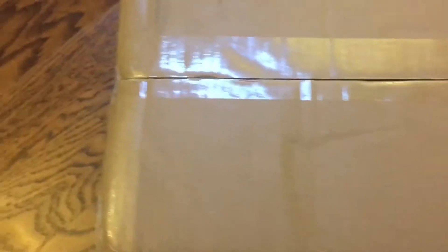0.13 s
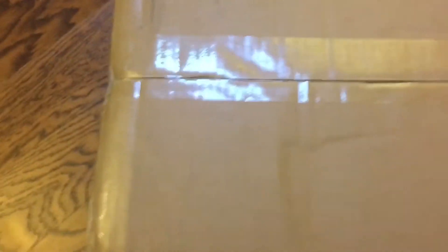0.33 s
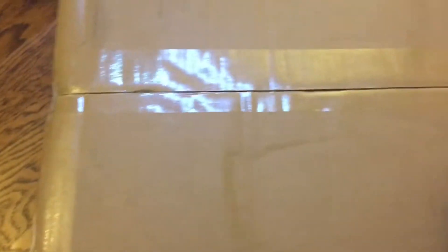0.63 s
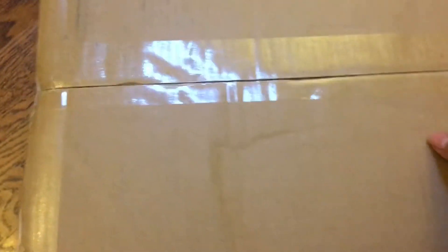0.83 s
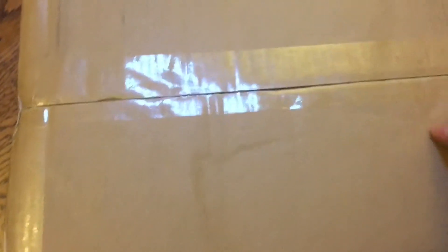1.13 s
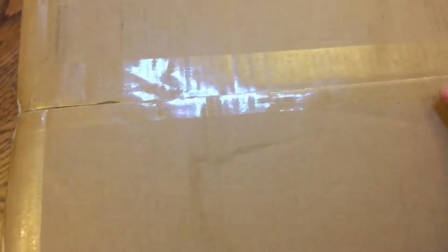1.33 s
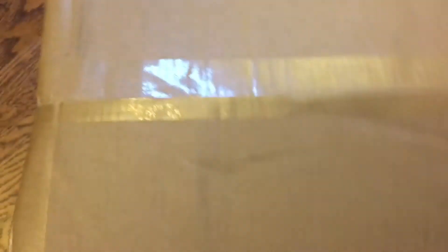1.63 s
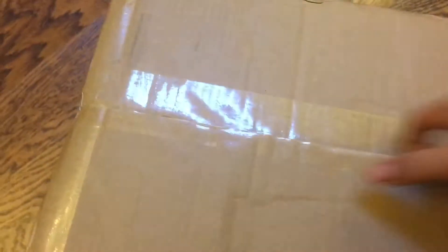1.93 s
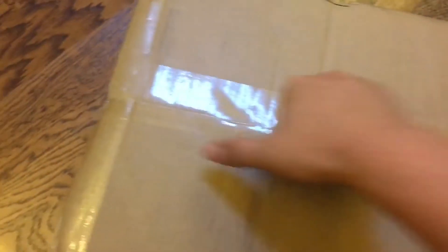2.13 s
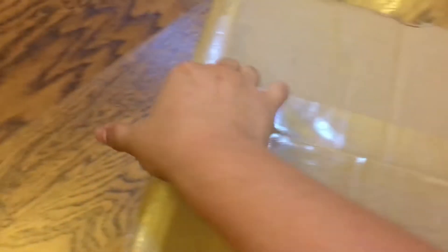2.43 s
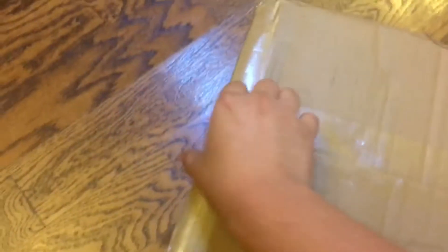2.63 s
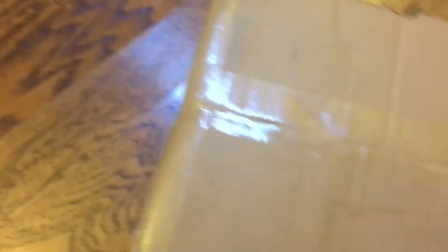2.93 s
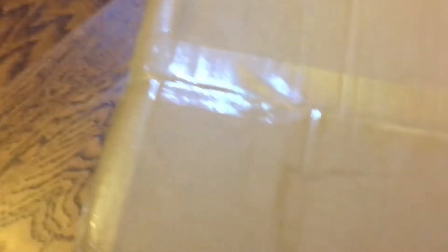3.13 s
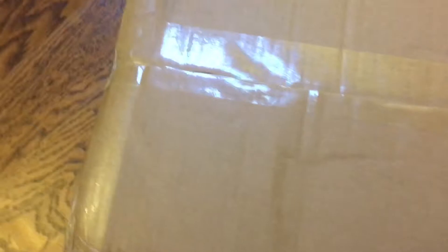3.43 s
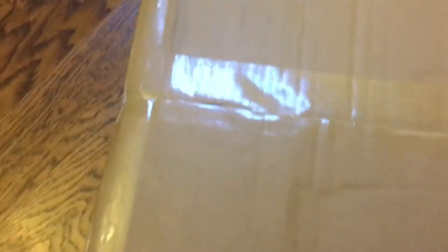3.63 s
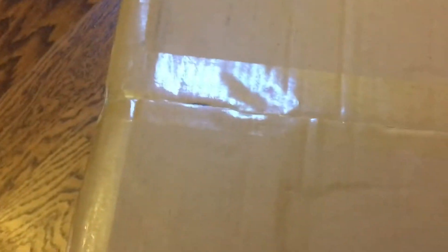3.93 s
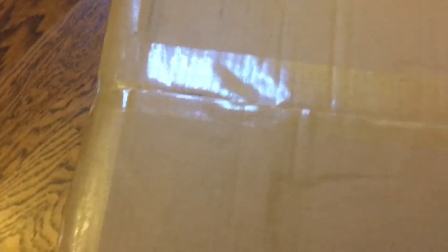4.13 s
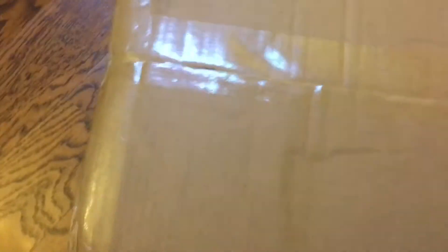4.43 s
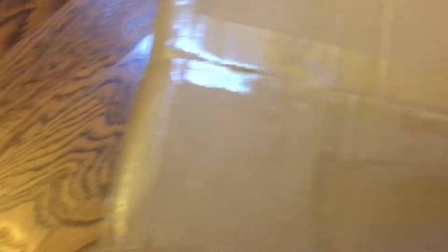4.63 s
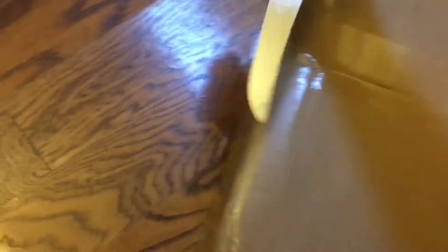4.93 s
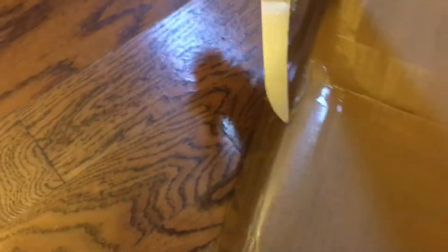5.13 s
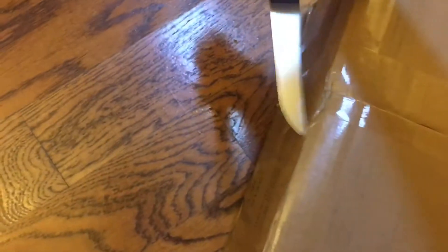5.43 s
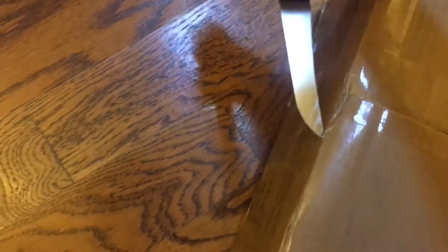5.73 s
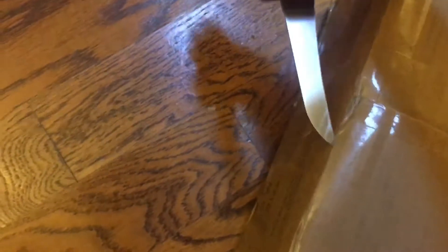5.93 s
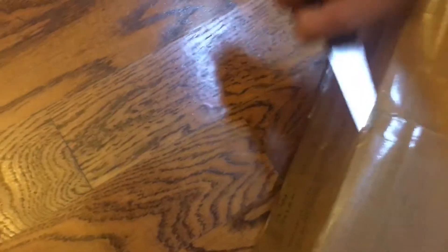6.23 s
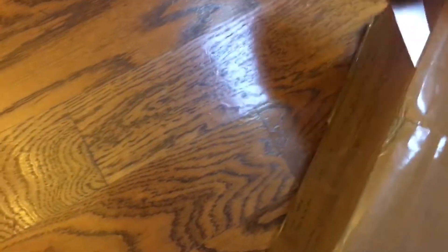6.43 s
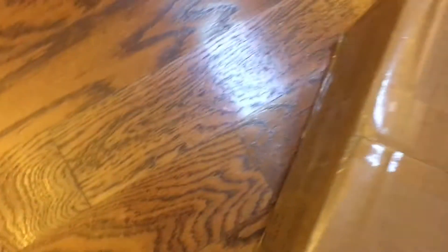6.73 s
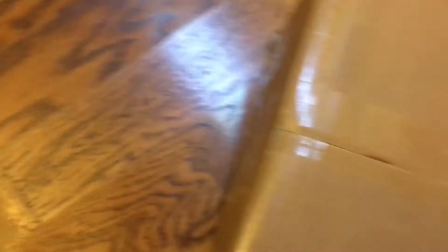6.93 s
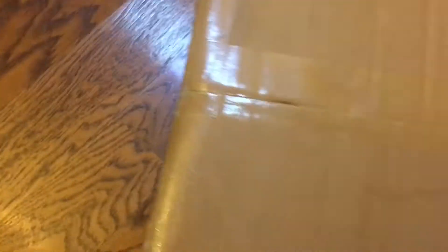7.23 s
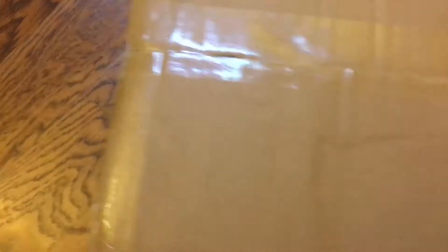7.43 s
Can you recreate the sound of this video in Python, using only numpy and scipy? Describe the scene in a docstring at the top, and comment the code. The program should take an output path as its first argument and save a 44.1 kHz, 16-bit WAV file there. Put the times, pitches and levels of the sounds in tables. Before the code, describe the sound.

Hard, boxy clattering with brief steel ringing opens the scene, fading into rasping card. Loud tape snaps, papery friction and dull flap thumps follow, then near quiet with small knocks and a light metallic tick. Dry, crisp pops multiply as a blade works into the tape, with a scrape, before a last clattering knock. Close handheld pickup, indoors, short room echo, faint low hum.

```python
"""A knife clatters and bounces on a cardboard box, hands slide over flaps and tape, the tape snaps and
crackles as the blade pokes and slits it, over faint air noise and a low hum. Noise bursts ring the box
panels (knocks) and tuned peaks (snaps); sines ring the blade; clustered random catches make the rubbing;
decaying noise makes the room's echo."""
import sys
import numpy as np
from scipy import signal
from scipy.fft import rfft, irfft
from scipy.io import wavfile

SR = 44100
rng = np.random.default_rng(int(sys.argv[2]) if len(sys.argv) > 2 else 0)


def dump_mix(stems):
    """Bounce the given channels to the path in sys.argv[1] as a 16-bit WAV at rate SR."""
    frames = np.atleast_2d(stems).T  # one column per channel
    limited = np.clip(frames, -1, 1)  # hard clip at full scale
    pcm = np.round(limited * 32767).astype(np.int16)
    wavfile.write(sys.argv[1], SR, pcm)


N = 334719

FIRM_RUB_DB = -50.5   # level at which a rub counts as firm
SNAP_S = 0.0023   # decay time of the spray in crackle and in a snap's echo


def from_db(db):
    """Decibels to gain."""
    return 10 ** (np.asarray(db) / 20)


def rms_one(x):
    """Scale to unit rms."""
    return x / np.sqrt(np.mean(x ** 2) + 1e-20)


def at_hz(points, hz):
    """Read a (f/Hz, value) table on a log-frequency axis."""
    table_hz, values = np.array(points)[:, :2].T
    return np.interp(np.log(hz), np.log(table_hz), values)


def coloured(x, spectrum):
    """Filter a white signal to a spectrum; unit rms."""
    hz = np.maximum(np.arange(N // 2 + 1) * SR / N, 1)
    return rms_one(irfft(rfft(x) * from_db(at_hz(spectrum, hz)), N))


def drift(rate_hz):
    """Slow random wander with spread 1: noise through a two-pole low-pass."""
    r = np.exp(-2 * np.pi * rate_hz / SR)
    wander = signal.lfilter([1], [1, -2 * r, r * r], rng.standard_normal(N + SR))
    return rms_one(wander[SR:])   # skip the filter's start-up


def resonance(x, hz, width_hz):
    """Two-pole peak with gain 1 on top."""
    r = np.exp(-np.pi * width_hz / SR)
    zeros = [(1 - r * r) / 2, 0, (r * r - 1) / 2]
    poles = [1, -2 * r * np.cos(2 * np.pi * hz / SR), r * r]
    return signal.lfilter(zeros, poles, x)


def burst(noise, decay_s):
    """One sharp break followed by a dying spray of smaller ones."""
    spray = noise * np.exp(-np.arange(len(noise)) / (max(decay_s, 1e-4) * SR))
    spray[0] = 2.8
    return spray


def add(track, s, sound, peak_db):
    """Lay a sound on the track at s seconds with its peak at the given level."""
    i = round(s * SR)
    scaled = from_db(peak_db) * sound / np.abs(sound).max()
    track[i:i + len(sound)] += scaled[:N - i]


def house():
    """Broad air noise, and a wavering low hum from noise through two equal narrow peaks."""
    # quiet air: f/Hz, relative level per Hz/dB
    air_spectrum = [(15, -38), (25, -14), (59, -5.5), (127, -7.5), (200, -27.5), (229, -14.5), (476, -28),
                    (1700, -33), (2910, -36), (3620, -38), (5000, -40.5), (7310, -42.5), (16000, -48.5)]
    air_db, hum_db = -62.5, -62
    hum_hz, hum_width_hz = 61, 6.2   # width of each peak
    air = coloured(rng.standard_normal(N), air_spectrum)
    hum = resonance(rng.standard_normal(N), hum_hz, hum_width_hz)
    hum = resonance(hum, hum_hz, hum_width_hz)
    return from_db(air_db) * air + from_db(hum_db) * rms_one(hum)


def room(x):
    """Dense reflections: noise that dies faster or slower by half-octave band."""
    # reverberation time: f/Hz, t60/s
    decay_times = [(200, .35), (530, .5), (1400, 0.52), (3700, 0.45), (9700, 0.19)]
    # colour of the echo: f/Hz, level/dB
    echo_colour = [(100, -12), (400, -6.5), (1200, -0.5), (3000, -4), (6000, -8), (14000, -6.5)]
    t = np.arange(SR) / SR
    edges = 70 * 2 ** np.arange(0, 8.1, .5)
    white = rng.standard_normal((2, SR))   # neighbouring bands take different noise
    tail = 0
    for k, (low, high) in enumerate(zip(edges, edges[1:])):
        hz = np.sqrt(low * high)
        band_pass = signal.butter(2, [low, high], "band", fs=SR, output="sos")
        band = signal.sosfilt(band_pass, white[k % 2])
        level_db = at_hz(echo_colour, hz) - 60 * t / at_hz(decay_times, hz)
        tail = tail + band * from_db(level_db)
    tail = tail * np.clip(t / 0.0081, 0, 1)   # first walls answer after a few ms
    return signal.fftconvolve(x, tail / np.sqrt(np.sum(tail ** 2)))[:N]


def thumps():
    """A slow push sets one large panel swinging for a few cycles."""
    # soft palms and flaps pushing the big panels: t/s, peak level/dB, f/Hz
    pushes = [(0.678, -37.5, 333), (1.264, -44, 182), (1.391, -39, 370), (1.505, -27, 238),
              (1.541, -31, 235), (1.716, -26, 233), (1.736, -45, 71.6), (1.831, -34.5, 111),
              (1.965, -37, 114), (2.08, -42, 99), (2.171, -35.5, 93), (2.201, -34.5, 103), (2.249, -46, 79),
              (2.476, -43, 182), (2.76, -45.5, 174), (3.81, -45.5, 288), (3.84, -35, 304),
              (3.898, -42, 250), (5.803, -44.5, 241), (6.199, -39, 288), (6.315, -37.5, 205),
              (6.663, -41.5, 310)]
    thump_cycles = 1.72   # the swell peaks at half this many cycles
    out, t = np.zeros(N), np.arange(SR // 5) / SR
    for s, db, hz in pushes:
        cycles = hz * t
        swell = cycles * np.exp(-cycles * 2 / thump_cycles)
        add(out, s, swell * np.sin(2 * np.pi * cycles), db)
    return out


def friction(spectrum, per_s, spread_db, smooth, lumps_db, patch_db):
    """Fibres catch at random, in clumps, over a smooth hiss; each catch has its own pitch range."""
    sizes = from_db(spread_db * np.minimum(rng.exponential(1, N), 5)) * rng.choice([-1, 1], N)
    clumped_rate = per_s * from_db(5 * drift(25))
    caught = rms_one(sizes * (rng.random(N) < clumped_rate / SR))
    pitches = np.geomspace(spectrum[1][0], min(spectrum[-2][0], 14000), num=6)
    dealt = rng.integers(0, len(pitches), size=N)   # pitch range of each catch
    grains = 0
    for k, hz in enumerate(pitches):
        patches = from_db(patch_db * drift(3.5))   # each range swells and fades by itself
        force = caught * (dealt == k) + smooth * rng.standard_normal(N)
        # sqrt(hz): wider bands get more power
        grains = grains + patches * rms_one(resonance(force, hz, 0.44 * hz)) * np.sqrt(hz)
    return coloured(grains * from_db(lumps_db * drift(28)), spectrum)


def crackle(rub):
    """Small snaps come at random, more often the firmer the tape is rubbed, each a short pitched spray."""
    firm_rate_per_s = 67   # at a firm rub
    level_db, spread_db = -10, 1.5   # level against the rub; spread of snap sizes
    sizes = from_db(spread_db * np.minimum(rng.exponential(1, N), 3))
    chance = firm_rate_per_s / SR * np.sqrt(rub / from_db(FIRM_RUB_DB))
    starts = sizes * (rng.random(N) < chance)
    pitches = np.geomspace(1300., 7500., num=5)
    dealt = rng.integers(0, 5, size=N)   # pitch of each snap
    fade = np.exp(-1 / (SNAP_S * SR))
    ticks = 0
    for k, hz in enumerate(pitches):
        envelope = signal.lfilter([1], [1, -fade], starts * (dealt == k) + 1e-18)
        ticks = ticks + resonance(envelope * rng.standard_normal(N), hz, 0.27 * hz)
    return from_db(level_db) * rub * rms_one(ticks)


def rubbing():
    """Hands and blade slide: card rasps, tape hisses and crackles, the panels rumble along."""
    # sliding contact, one list a passage: t/s, card rasp level/dB, tape hiss level/dB, its treble level/dB
    passages = [
        [(0.45, -33.5, -45, -67), (0.528, -48, -45, -73), (0.588, -47, -57, -73), (0.702, -41, -63, -63),
         (0.796, -59, -66, -74), (0.894, -55, -73.5, -82), (0.98, -59.5, -77.5, -83.5)],
        [(1.0, -69, -90.5, -82.5), (1.15, -59, -52, -79.5), (1.198, -83, -52.5, -45), (1.286, -51, -51.5, -66),
         (1.338, -60.5, -54, -66), (1.416, -51.5, -55, -60), (1.566, -53.5, -49, -57.5),
         (1.76, -46.5, -58.5, -63), (1.93, -57, -58, -65.5)],
        [(1.94, -56, -51.5, -61.5), (2.004, -50.5, -50.5, -56), (2.122, -52, -48, -50),
         (2.176, -43, -48.5, -49.5), (2.336, -54.5, -53, -53.5), (2.476, -53, -50, -61.5),
         (2.57, -61.5, -66, -77.5), (2.896, -71, -73.5, -73), (2.95, -79, -72.5, -80.5)],
        [(3.0, -77, -83, -75.5), (3.298, -71.5, -79.5, -79), (3.57, -79, -85.5, -84), (3.868, -69, -81.5, -82),
         (4.002, -62.5, -79.5, -88), (4.06, -57, -74.5, -74.5), (4.132, -65, -62, -61), (4.3, -73, -74, -81),
         (4.6, -80.5, -82, -79.5)],
        [(5.0, -75, -79, -77.5), (5.188, -66.5, -85, -88), (5.306, -69.5, -74, -73.5), (5.454, -65.5, -68, -72),
         (5.612, -69, -64, -70), (5.77, -68, -71.5, -80.5), (5.894, -70, -77, -78), (6.034, -64.5, -65, -67),
         (6.09, -82.5, -82.5, -86)],
        [(6.11, -38, -46.5, -68.5), (6.158, -50, -48.5, -47.5), (6.28, -45.5, -52.5, -56.5),
         (6.35, -46, -49, -55.5), (6.528, -45.5, -57, -50.5), (6.586, -53.5, -58, -53), (6.71, -46, -45, -45)],
        [(6.73, -58, -62.5, -66.5), (6.772, -70.5, -65.5, -65), (6.948, -63.5, -71, -71),
         (7.074, -69.5, -69.5, -74), (7.286, -74, -80.5, -79.5), (7.45, -70, -74.5, -76)],
    ]
    # panel rumble at a firm rub, one a passage; palms push the box more than the blade: level/dB
    passage_rumble_db = [-62.5, -48.5, -50.5, -52.5, -48.5, -57, -51]
    # card: f/Hz, relative level per Hz/dB
    rasp_spectrum = [(240, -26), (400, 5.5), (532, 4), (1580, 5.5), (2260, 0), (3040, -10.5), (3490, -0.5),
                     (5000, -17.5), (6500, -56), (11000, -120)]
    # tape: f/Hz, relative level per Hz/dB
    hiss_spectrum = [(1180, -55), (2000, -3.5), (2830, -8.5), (4570, -3.5), (6700, -8.5), (9740, -12.5),
                     (10500, -13.5), (14000, -11), (16000, -11)]
    # panels: f/Hz, relative level per Hz/dB
    rumble_spectrum = [(24, -36), (40, -2), (102, 3), (151, 1), (423, -6), (534, -37.5), (900, -9.5),
                       (1170, -49), (1980, -120)]
    rumble_follows = 0.98   # share of the rub's dB swing that the rumble follows
    tape_lumps_db, card_lumps_db, panel_lumps_db = 1.6, 3.5, 3   # fast unevenness
    t = np.arange(N) / SR
    s, *levels = np.transpose(np.vstack(passages))
    rasp, hiss, sheen = [from_db(np.interp(t, s, level, -120, -120)) for level in levels]
    rub = np.hypot(rasp, hiss)
    push_db = np.interp(t, s, np.repeat(passage_rumble_db, [len(passage) for passage in passages]))
    rumble = from_db(push_db) * (rub / from_db(FIRM_RUB_DB)) ** rumble_follows
    # the tape's body and treble are split so that each follows its own level
    tape = friction(hiss_spectrum, 2100.0, 1.7, 0.42, tape_lumps_db, 2.4)
    top = signal.sosfilt(signal.butter(4, 7500., "high", fs=SR, output="sos"), tape)
    body = signal.sosfilt(signal.butter(4, 7500., fs=SR, output="sos"), tape)
    card = friction(rasp_spectrum, 450., 4.2, 0.49, card_lumps_db, 2.6)
    panels = friction(rumble_spectrum, 49.0, 3.1, 1.0, panel_lumps_db, 1.5)
    return rasp * card + hiss * rms_one(body) + sheen * rms_one(top) + rumble * panels + crackle(hiss)


def box(force, pitch_hz=600., deep_db=0., bright_db=0.):
    """The panels ring in parallel, signs alternating; a blow's spot and hardness favour some panels."""
    # box panels: f/Hz, width/Hz, relative level/dB
    panels = [(131, 13, -23.5), (250, 72, -14.5), (325, 91, -1.5), (433.8, 85, -3.5), (547, 68, -3),
              (656.7, 110, -3.5), (722.2, 120, -5), (925, 117, -4.5), (1147, 170, -5.5), (1436, 120, -6),
              (1740, 260, -4.5), (1940, 88, 2.5), (2350, 220, -0.5), (2849, 90, -3), (3330, 730, -9),
              (4400, 2800, -17), (7650, 3600, -27.5)]
    tilt = [(pitch_hz / 4, 2.0 * deep_db), (pitch_hz / 2, deep_db), (pitch_hz, 0.), (4 * pitch_hz, bright_db)]
    ringing = 0
    for k, (hz, width_hz, db) in enumerate(panels):
        gain = (-1) ** k * from_db(db + at_hz(tilt, hz))
        ringing = ringing + gain * resonance(force, hz, width_hz)
    return ringing


def snaps():
    """Each snap has a pitched body, a treble edge and a share that shakes the box; returns near and far."""
    # tape and card snapping: t/s, body peak level/dB, f/Hz, treble and box levels against the body/dB,
    # decay time/s
    snap_table = [(1.052, -60, 1540, -14.5, -19, 0.0017), (1.1425, -27.5, 1240, -36, -36, 0.0014),
                  (1.163, -10, 1870, -48, -22.5, 0.0022), (1.206, -45, 1800, -36, -33, 0.0015),
                  (1.2746, -30.5, 1200, -20, -1.5, 0.0023), (1.2835, -16, 3970, -25, -14.5, 0.0027),
                  (1.363, -28.5, 3860, -10, -28, 0.0014), (1.381, -24.5, 2340, -15, -31, 0.0016),
                  (1.391, -23, 3400, -12, -31, 0.0023), (1.4, -18.5, 3480, -15, -9, 0.0013),
                  (1.4293, -20.5, 3150, -13, -9.5, 0.0027), (1.503, -15.5, 1270, -40, -39, 0.0042),
                  (1.5325, -19, 4400, -17, -10, 0.0042), (1.5673, -20.5, 1410, -25, -15, 0.0032),
                  (1.5974, -20, 2200, -35, -26, 0.0014), (1.661, -44, 1150, -29, -16, 0.0016),
                  (1.723, -26, 5230, -17, -9, 0.0048), (1.7866, -30.5, 1300, -15, -20, 0.0019),
                  (2.0446, -21.5, 1950, -18, -24, 0.00053), (2.15, -32, 5300, -15, -7, 0.0019),
                  (2.4535, -24.5, 1660, -26, -24, 0.0016), (2.471, -26, 1730, -25, -29, 0.00088),
                  (2.4957, -23, 4180, -7, -13.5, 0.0008), (2.6573, -21.5, 5000, 1, -18, 0.00053),
                  (2.6943, -33, 3950, -4, -18, 0.0023), (2.7564, -33, 1340, -15, -13, 0.001),
                  (2.773, -30.5, 3200, -20, -8.5, 0.0012), (2.784, -37.5, 2050, -29, -4, 0.0026),
                  (3.181, -40, 6300, -15, -22.5, 0.0019), (3.3536, -51.5, 5040, -7.5, -26, 0.0016),
                  (3.8048, -44.5, 1450, -12.5, -14, 0.0016), (3.8454, -28, 2020, -13, -24, 0.0008),
                  (3.8737, -35, 1510, -26, -18, 0.00088), (4.2646, -42.5, 2360, -31, -28, 0.0029),
                  (4.4817, -29, 3260, -8, -28.5, 0.0014), (4.761, -47, 6500, -11, -18, 0.0016),
                  (5.252, -34.5, 3254, -16, -7, 0.0016), (5.2893, -24, 3210, -25, -34, 0.0011),
                  (5.3606, -20.5, 3330, -6, -18, 0.0016), (5.3714, -11.5, 2315, -12.5, -27, 0.0011),
                  (5.499, -39.5, 2100, -20, 0, 0.0016), (5.5347, -22, 2500, -53, -26, 0.0018),
                  (5.5618, -31, 3840, -25, -20, 0.0025), (5.5852, -26.5, 3700, -21, -10.5, 0.0012),
                  (5.5966, -33, 1880, -22, -26, 0.0024), (5.63, -25, 3300, -19, -15.5, 0.002),
                  (5.8043, -17.5, 2350, -5, -19, 0.0023), (5.9327, -28, 2410, -25.5, -18, 0.0017),
                  (5.9416, -21.5, 6650, -26, -29, 0.0012), (5.9793, -25.5, 2420, -43, -20, 0.0022),
                  (6.019, -47, 2410, -19, -20.5, 0.0011), (6.1049, -11, 4170, -8, -20.5, 0.00077),
                  (6.128, -17.5, 4300, -8, -30, 0.0033), (6.1805, -25.5, 1780, -33, -30, 0.0028),
                  (6.202, -30, 1140, -25, -3, 0.0022), (6.348, -26.5, 1880, -23, -16, 0.0016),
                  (6.4158, -8, 3810, -7, -26, 0.0023), (6.4493, -16.5, 1810, -3, -38, 0.00053),
                  (6.491, -15, 1850, -5, -25, 0.00053), (6.707, -23.5, 5560, -30, -25, 0.0022),
                  (6.7785, -36, 5150, -8.5, -21, 0.0021), (6.9513, -34, 4400, -9, -19, 0.0013),
                  (7.3412, -40, 2446, -20, -27, 0.0018)]
    room_db, room_width = -15, 1.1   # echo send against the body; width of its peaks over the pitch
    near, far = np.zeros(N), np.zeros(N)
    edge = signal.butter(2, 6500., "high", fs=SR)
    noises = rng.standard_normal((len(snap_table), 1500))
    for (s, db, hz, treble_db, box_db, decay_s), noise in zip(snap_table, noises):
        force = burst(noise, decay_s)
        add(near, s, resonance(force, hz, 0.55 * hz), db)
        add(near, s, signal.lfilter(*edge, force), db + treble_db)
        dull_force = signal.lfilter([.1], [1, -.9], force)
        add(near, s, box(dull_force), db + box_db)
        echo = resonance(burst(.1 * noise, SNAP_S), hz, room_width * hz)
        add(far, s, resonance(echo, hz, room_width * hz), db + room_db)
    return near, far


def clinks():
    """A bright crack of filtered noise, then the steel modes ring on as dying sines; returns both."""
    # steel blade struck: t/s, crack peak level/dB, crack f/Hz, crack decay time/s, ring peak level/dB
    strikes = [(0.2713, -13.5, 3220, 0.0031, -61), (0.3205, -9.5, 5800, 0.0041, -56),
               (0.4238, -4.5, 4000, 0.0026, -28.5), (0.578, -37, 5960, 0.0015, -59),
               (0.68, -31, 9000, 0.0012, -56), (4.0771, -21.5, 5640, 0.0069, -44),
               (4.1024, -20, 5040, 0.006, -64), (7.4405, -24.5, 5896, 0.0033, -53),
               (7.519, -14, 4130, 0.002, -34.5)]
    # blade modes: f/Hz, relative level/dB, t60/s
    modes = [(2300, -24, .4), (4269, -26, .4), (6503, -10, .38), (7074, -24, .12)]
    cracks, rings = np.zeros(N), np.zeros(N)
    t = np.arange(SR // 2) / SR
    thin = signal.butter(2, 2500., "high", fs=SR)
    ring = sum(from_db(d - 60 * t / t60) * np.sin(2 * np.pi * f * t) for f, d, t60 in modes)
    noises = rng.standard_normal((len(strikes), 2000))
    for (s, db, hz, decay_s, ring_db), noise in zip(strikes, noises):
        crack = resonance(burst(noise, decay_s), hz, 0.52 * hz)
        add(cracks, s, signal.lfilter(*thin, crack), db)
        add(rings, s, ring, ring_db)
    return cracks, rings


def knocks():
    """A rattling contact drives the panels; dull blows are softened too. Returns near and far sound."""
    # knife and hands knocking the box: t/s, peak level/dB, favoured f/Hz, low panels/dB, high panels/dB
    blows = [(0.27, -23.5, 549, -25, -22), (0.302, -1.5, 540, -11, -6.5), (0.311, -7, 545, -6, -12.5),
             (0.404, -2, 540, -19.5, -13.5), (0.424, -20, 626, -14, 18), (0.445, -15.5, 524, -12, -27),
             (0.505, -18.5, 530, -10.5, -8), (0.511, -13.5, 585, -12, -22), (0.542, -23.5, 560, -18, -20),
             (0.575, -15.5, 580, -14.5, -18), (0.581, -15, 1080, -31, -11.5), (0.615, -19, 536, -17, -25),
             (0.624, -21.5, 620, -33, -14), (0.653, -18.5, 487, -30, -15.5), (0.66, -17, 546, -39, -13.5),
             (0.68, -20, 670, -22, -25), (0.704, -22.5, 565, -13, -20.5), (1.503, -22, 860, -3, -19),
             (1.71, -33, 735, -39, -20), (3.437, -44, 553, -18, -30), (3.452, -33, 576, -13.5, -27.5),
             (3.475, -39, 535, -17.5, -25), (3.657, -48.5, 452, -13.5, -31.5), (3.843, -37, 570, -5, -18),
             (3.896, -42.5, 470, 0, -14), (4.015, -36.5, 608, -18, -22), (4.033, -35.5, 600, -20, -25.5),
             (4.077, -31, 570, -37, -35), (4.101, -40.5, 550, -21, -20), (4.116, -35.5, 543, -32, -18),
             (4.178, -42, 585, -21.5, -21), (7.44, -35.5, 538, -16.5, -10), (7.498, -28, 1080, -4, -7),
             (7.51, -4.5, 894, -6.5, -14.5), (7.522, -15, 1080, -32, 2)]
    contact_s = 0.0022   # decay time of the contact for a blow at 0 dB
    hardness_per_db = 0.304   # softer blows last longer: dB of length per dB of level
    near, far = np.zeros(N), np.zeros(N)
    noises = rng.standard_normal((len(blows), 3000))
    for (s, db, hz, deep_db, bright_db), noise in zip(blows, noises):
        soft = signal.butter(2, np.clip(33300.0 * from_db(bright_db), 900., 16000.), fs=SR)
        decay_s = contact_s * from_db(-hardness_per_db * db)
        # less spray on the far track: the room hears mostly the first break
        for track, spray in (near, .6), (far, .25):
            force = signal.lfilter(*soft, burst(spray * noise, decay_s))
            add(track, s, box(force, hz, deep_db, bright_db), db)
    return near, far


def scene():
    """Near sounds, their room, and the air of the house."""
    knock_room_db, rub_room_db, clink_room_db = -10, -22.5, -10.5
    knock, knock_far = knocks()
    clink, ring = clinks()
    snap, snap_far = snaps()
    rub = rubbing()
    send = from_db(knock_room_db) * knock_far + from_db(clink_room_db) * clink
    send = send + from_db(rub_room_db) * rub + snap_far
    return (knock + clink + ring + snap + rub + thumps() + room(send) + house())[None]


def record(dry):
    """A steep low-pass takes the top off: 70 dB down from 16.8 kHz up."""
    return signal.sosfilt(signal.cheby2(12, 70, 16800, fs=SR, output="sos"), dry)


dry = scene()
out = record(dry)
dump_mix(out)
```